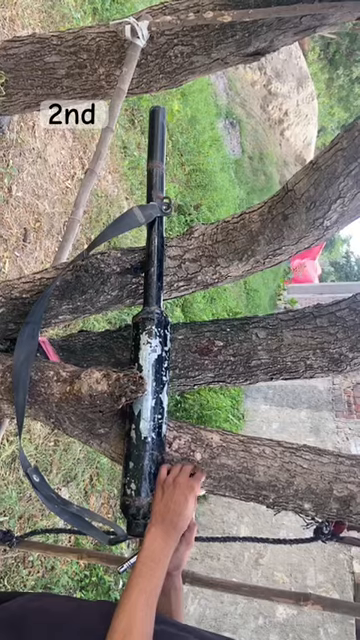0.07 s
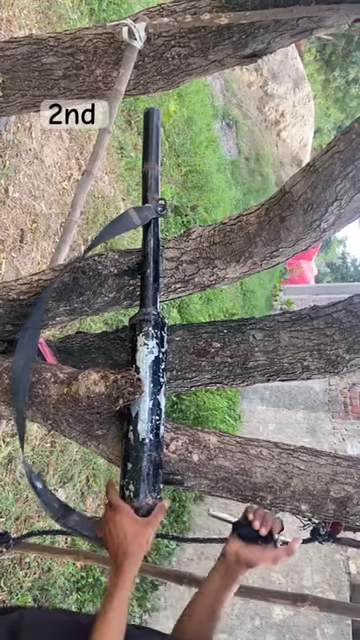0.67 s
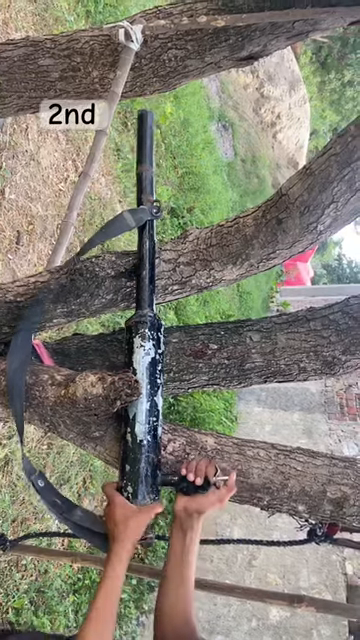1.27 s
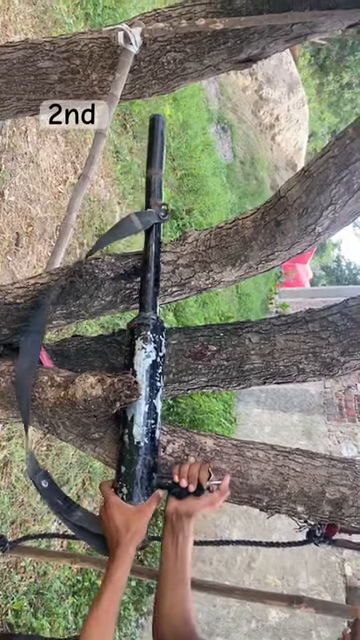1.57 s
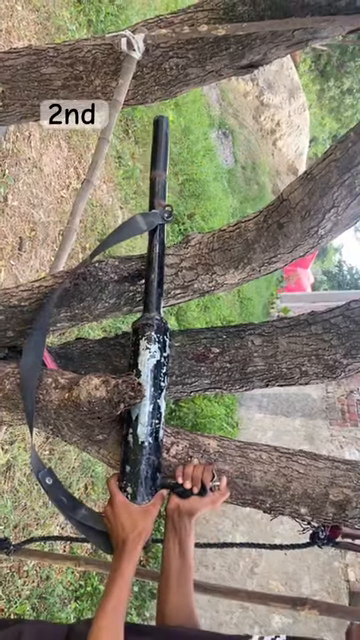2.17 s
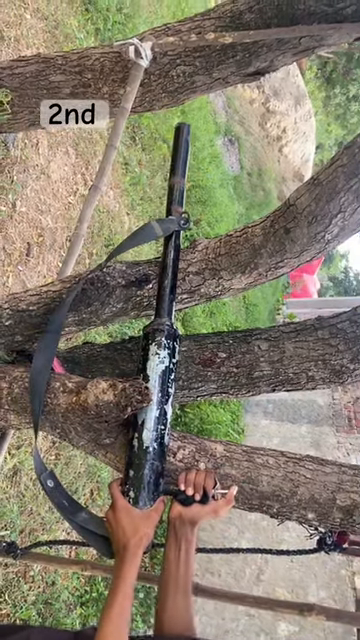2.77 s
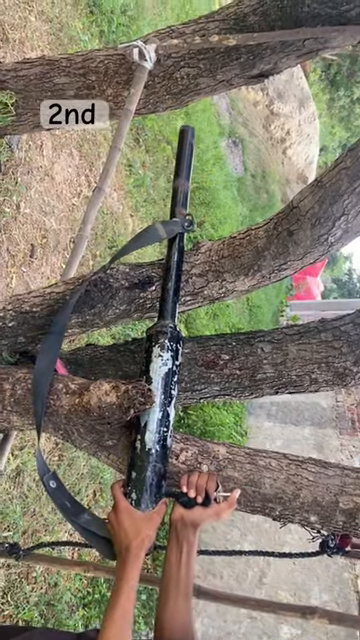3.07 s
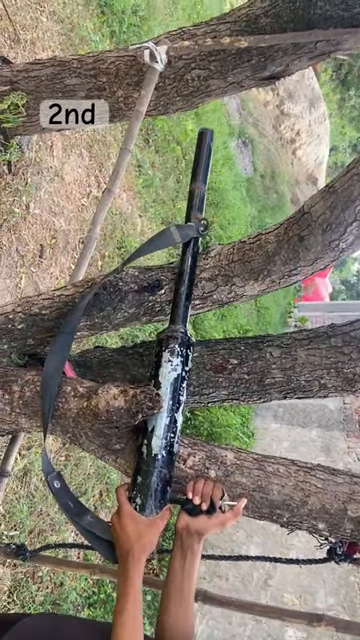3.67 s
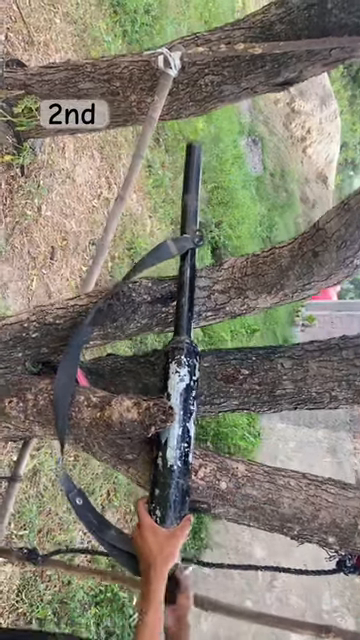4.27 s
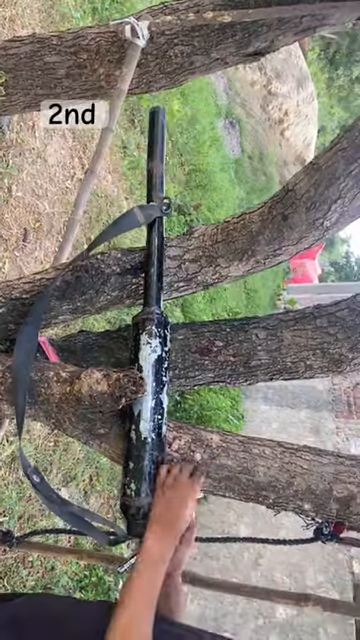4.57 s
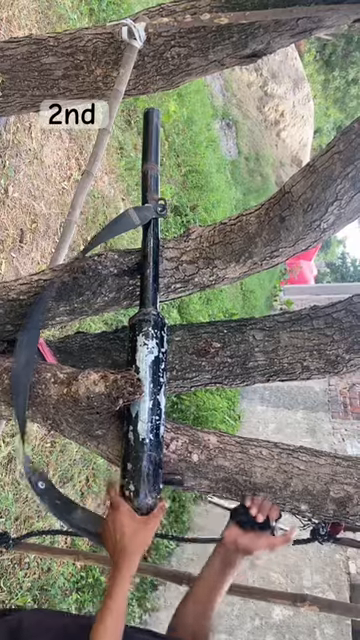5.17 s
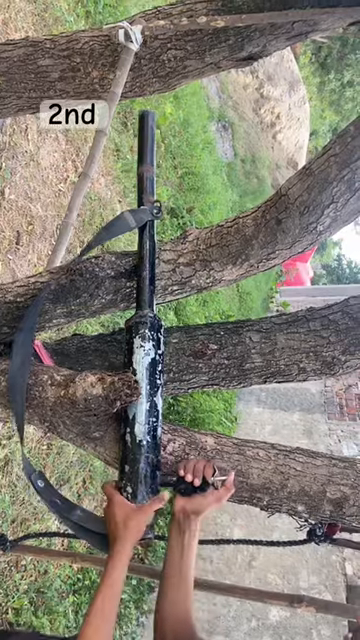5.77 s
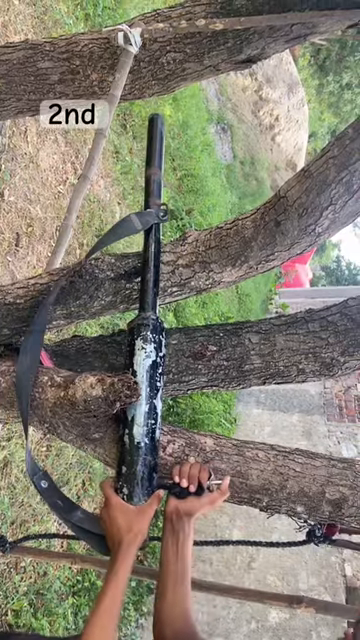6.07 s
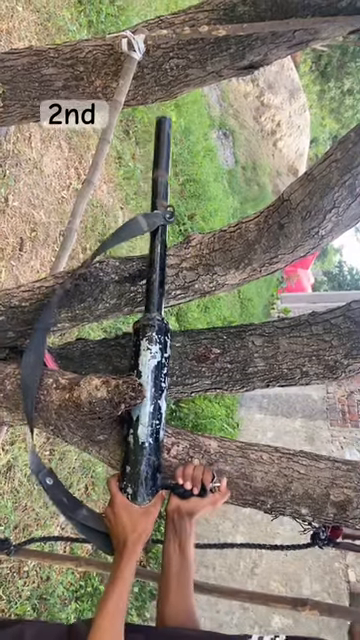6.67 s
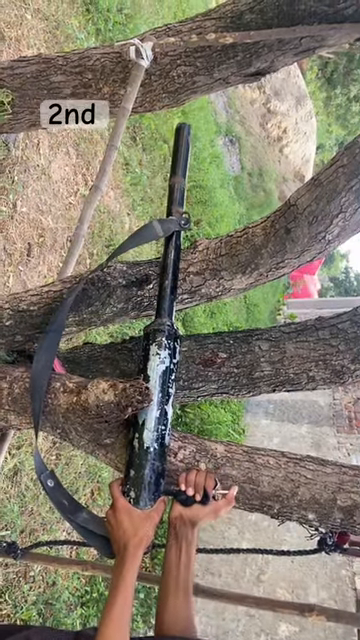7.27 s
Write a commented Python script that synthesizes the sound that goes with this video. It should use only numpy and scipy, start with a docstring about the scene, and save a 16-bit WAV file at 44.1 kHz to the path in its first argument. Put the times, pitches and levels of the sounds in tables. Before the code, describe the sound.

A pipe cannon fires two sharp, echoing bangs outdoors, with faint clicks before each and a loud, hollow double thump between them.

```python
"""Pipe cannon in a tree

A home-made pipe cannon is fired outdoors. A hand igniter ticks and scrapes into the steel chamber,
the gas swells into a blast, walls slap back and the far landscape rolls on. Hands then knock on the
pipe, ending in a loud, hollow double thump close to the microphone. The same sound then plays again
from the start and stops while the second shot is still rolling away."""
import sys
import numpy as np
from scipy import signal
from scipy.fft import rfft, irfft, next_fast_len
from scipy.io import wavfile
from scipy.ndimage import uniform_filter1d

SR = 44100
rng = np.random.default_rng(int(sys.argv[2]) if len(sys.argv) > 2 else 0)


def materialize(psi):
    """Save the field psi as 16-bit PCM at rate SR to the path in sys.argv[1].

    A 1-D psi becomes a single channel; in a 2-D psi each row is a channel.
    """
    bounded = np.clip(np.atleast_2d(psi).T, -1, 1)
    quanta = np.round(bounded * 32767).astype(np.int16)
    wavfile.write(sys.argv[1], SR, quanta)


N = 322371
START_S, END_S, REPEAT_S, SHOT_S = .036, 4.4877, 4.45168, 2.0838
T = np.arange(round(END_S * SR)) / SR   # the clock for one firing, in seconds
SIZE = next_fast_len(len(T) + SR // 4, real=True)
HZ = np.maximum(np.fft.rfftfreq(SIZE, 1 / SR), 1)
SIDES = np.array([[1], [-1]])   # left, right


def amp(db):
    """Turn decibels into a gain."""
    return 10 ** (np.asarray(db) / 20)


def pan(db):
    """Two gains that make the left side db louder than the right."""
    return amp(SIDES * db / 2)


def rms_one(x):
    """Scale a signal to an average strength (rms) of 1."""
    return x / np.sqrt(np.mean(x ** 2) + 1e-30)


def at_hz(points, hz):
    """Read between the rows of a table, spacing frequencies by octaves."""
    f, value = np.transpose(points)
    return np.interp(np.log(hz), np.log(f), value)


def filtered(x, response):
    """Turn each frequency of a sound up or down."""
    return irfft(rfft(x, SIZE) * response, SIZE)[..., :len(T)]


def causal(points):
    """Make a filter from a table so that nothing sounds early (minimum phase)."""
    cepstrum = irfft(np.log(amp(at_hz(points, HZ))), SIZE)
    lag = np.arange(SIZE)
    return np.exp(rfft(cepstrum * np.where(lag == 0, 1, 2 * (lag < SIZE // 2))))


def resonance(hz, width_hz):
    """A filter that rings at one pitch, with gain 1 there."""
    return 1 / (1 + 1j * (HZ ** 2 - hz ** 2) / (HZ * width_hz))


def band_noise(hz, width_hz):
    """Hiss gathered around one pitch."""
    return rms_one(filtered(rng.standard_normal(len(T)), resonance(hz, width_hz) ** 2))


def wobble(count, smooth_samples):
    """A random wander, made by smoothing noise."""
    return rms_one(uniform_filter1d(rng.standard_normal(count), int(smooth_samples)))


def thirds(noise, colour):
    """Split noise into bands a third of an octave apart: (centre_hz, share of the level, band)."""
    centres = 1000 * 2 ** (np.arange(-14, 12) / 3)
    shares = amp(at_hz(colour, centres)) * np.sqrt(centres)
    size = next_fast_len(noise.shape[-1], real=True)
    spectrum = rfft(noise, size)
    f = np.maximum(np.fft.rfftfreq(size, 1 / SR), 1)
    for hz, share in zip(centres, shares / np.linalg.norm(shares)):
        window = np.cos(np.pi / 2 * np.clip(3 * np.log2(f / hz), -1, 1)) ** 2
        yield hz, share, rms_one(irfft(spectrum * window, size)[:, :noise.shape[-1]])


def swell(t, peak_s, rise_db_per_s, hold_s, fall_db_per_s):
    """A gain that rises to 1, holds and falls."""
    before, after = np.maximum(peak_s - t, 0), np.maximum(t - peak_s - hold_s, 0)
    return amp(-rise_db_per_s * before - fall_db_per_s * after)


def bell(middle_s, half_s):
    """A smooth rise and fall around one moment."""
    return np.exp(-((T - middle_s) / half_s) ** 2 / 2)


def thud(start_s, db, first_hz, last_hz, glide_s, swell_s):
    """A short tone swells, sinks in pitch and quickly dies."""
    out, span = np.zeros(len(T)), (T > start_s) & (T < start_s + .2)
    t = T[span] - start_s
    sunk = 1 - np.exp(-t / glide_s)
    phase = 2 * np.pi * (last_hz * t + (first_hz - last_hz) * glide_s * sunk)
    envelope = (t / swell_s * np.exp(1 - t / swell_s)) ** 1.4
    out[span] = amp(db) * envelope * np.sin(phase)
    return out


# How alike left and right are (1 means the same): frequency_hz, likeness_0_to_1
LIKENESS = [(80, .95), (500, .75), (1100, .5), (2500, 0.8), (6000, .75), (10000, 1)]
def surrounding_noise():
    """Stereo hiss arriving from all around."""
    alike = np.clip(at_hz(LIKENESS, HZ), 0, 1)
    mid, side = rng.standard_normal((2, len(T)))
    return filtered(mid, np.sqrt(1 + alike)) + SIDES * filtered(side, np.sqrt(1 - alike))


# The tone of distant traffic and open air: frequency_hz, level_db
AIR_COLOUR = [(22, -18.5), (45, -4), (70, 1.5), (170, -15.5), (280, -18.5), (450, -16.5), (590, -23.5),
              (710, -19.5), (1000, -29), (1250, -37), (2000, -40), (3300, -47), (6500, -47), (9500, -58.5),
              (12500, -63)]
def open_air(level_db=-58.5, gain_dip_db=7, sink_s=.78, hold_s=.7, recovery_db_per_s=3):
    """Background rumble and hiss, turned down after the shot and slowly up, like a recorder's gain."""
    since = T - SHOT_S
    dip_db = gain_dip_db * np.clip(since / sink_s, 0, 1)
    recovered_db = recovery_db_per_s * np.maximum(since - sink_s - hold_s, 0)
    rumble = rms_one(filtered(surrounding_noise(), amp(at_hz(AIR_COLOUR, HZ))))
    return amp(level_db - dip_db + recovered_db) * rumble


# Light knocks on the pipe: start_s, level_db, last_pitch_hz
KNOCKS = [(.048, -51.5, 296), (.501, -51, 674), (3.4965, -58, 300), (3.521, -46.5, 200.4),
          (3.684, -52, 250), (3.915, -50, 198), (3.960, -52.5, 200)]
def knocks(first_hz=900):
    """Knuckles and rod hit the pipe; each knock sinks to its own pitch."""
    return sum(thud(s, db, first_hz, hz, glide_s=.00252, swell_s=.0022) for s, db, hz in KNOCKS)


# Soft swishes: middle_s, half_length_s, pitch_hz, width_hz, level_db
RUBS = [(0.30, 0.0333, 1980, 400, -80), (1.21, 0.0475, 9300, 1600, -92.5), (1.43, 0.067, 1790, 700, -85),
        (3.84, 0.0209, 3720, 1500, -86.5), (3.85, .03, 8350, 800, -96.5), (3.979, .16, 1400, 800, -82.5),
        (4.08, 0.228, 690, 400, -72.5)]
def rubs():
    """Hands, strap and bark rub, each rub a short swell of hiss."""
    return sum(amp(db) * bell(s, half_s) * band_noise(hz, width) for s, half_s, hz, width, db in RUBS)


# The rod taps the wall on its way in: start_s, level_db
TICKS = [(.345, -60), (0.395, -63.5), (0.458, -62), (.546, -62.5), (0.572, -56), (.683, -64), (.725, -63),
         (.823, -64)]
# It is pushed home in rasps that catch, fade and stop: start_s, level_db, length_s
SCRAPES = [(.891, -51, 0.023), (0.94, -52, 0.033), (0.975, -58, 0.056), (1.063, -59, 0.024),
           (1.096, -59.5, .045)]
# The notes of the chamber's air and steel wall: pitch_hz, width_hz, level_db
CHAMBER = [(791, 110, 15.5), (1564, 176, -3.5), (3550, 460, -18), (3980, 340, -16), (6300, 600, -29),
           (8020, 1100, -30)]
def igniter(grit=.98, uneven_db=3.5, slip_s=.0038, tick_fade_s=.0079, fade_db_per_s=123, stop_s=.0047):
    """The igniter rod's gritty friction makes the chamber ring, brighter for ticks than for scrapes."""
    ticks = sum(amp(db) * (T > s) * np.exp(-np.abs(T - s) / tick_fade_s) for s, db in TICKS)
    scrapes = 0
    for s, db, length_s in SCRAPES:
        stopping = np.exp(-np.maximum(T - s - length_s, 0) / stop_s)
        scrapes += amp(db - fade_db_per_s * np.abs(T - s)) * (T > s) * stopping
    slips = wobble(len(T), slip_s * SR)
    grains = rng.standard_normal(len(T)) * np.exp(grit * rng.standard_normal(len(T)))
    friction = rms_one(grains * amp(uneven_db * slips))
    body = sum(amp(db) * resonance(hz, width_hz) ** 2 for hz, width_hz, db in CHAMBER)
    bright_body = body * amp(3 * np.log2(HZ))   # 3 dB more per octave
    return sum(filtered(force * friction, ring / np.sqrt(np.mean(np.abs(ring) ** 2)))
               for force, ring in ((scrapes, body), (ticks, bright_body)))


def whistle(middle_s=.828, middle_hz=2240, sag_hz_per_s=4100, level_db=-68):
    """One faint falling note that grows less steady towards its end."""
    t = np.clip(T - middle_s, -.15, .15)
    waver = .017 * amp(110 * t) * wobble(len(T), smooth_samples=120)
    pitch_hz = (middle_hz - sag_hz_per_s * t) * (1 + waver)
    return amp(level_db) * bell(middle_s, half_s=.043) * np.sin(2 * np.pi * np.cumsum(pitch_hz) / SR)


# Soft, low bumps: start_s, level_db, last_pitch_hz
BUMPS = [(1.754, -42.5, 62), (4.240, -50, 197), (4.392, -30, 180)]
def bumps():
    """Handling the cannon makes dull bumps that sag a little in pitch."""
    return sum(thud(s, db, 1.3 * hz, hz, glide_s=.01, swell_s=.012) for s, db, hz in BUMPS)


def gas_jet(t, ignition_s=2.058, burst_db=-9, outflow_db=-29.5):
    """How hard the gas rushes out: a sharp burst on top of a weaker, longer outflow."""
    burst = swell(t, SHOT_S, rise_db_per_s=1800, hold_s=.003, fall_db_per_s=1999.5)
    outflow = swell(t, SHOT_S, rise_db_per_s=500, hold_s=.003, fall_db_per_s=460)
    return (amp(burst_db) * burst + amp(outflow_db) * outflow) * (t > ignition_s)


# The tone of the blast: frequency_hz, level_db
BLAST_COLOUR = [(35, -12.5), (80, -3.5), (170, -1), (290, 4.5), (440, -12.5), (660, 1), (900, -9.5),
                (1150, -3.5), (1550, -19.5), (1900, -11), (2600, -37.5), (3200, -22), (4000, -19.5),
                (5000, -41), (6400, -28.5), (8500, -43), (10000, -60.5), (11500, -78.5)]
# Which side the blast leans to: frequency_hz, left_minus_right_db
BLAST_PAN = [(200, 3.5), (430, 1.5), (660, -3), (1000, -5), (3000, -4.5), (5000, 0.5), (8000, -1.5)]
def blast(bass_lag_s=.012, lag_corner_hz=420):
    """Swirling gas bursts from the muzzle; the crack comes first and the lows swell after it."""
    out, span = np.zeros((2, len(T))), (T > 2) & (T < 2.3)
    for hz, share, band in thirds(surrounding_noise()[:, span], BLAST_COLOUR):
        envelope = gas_jet(T[span] - bass_lag_s / (1 + hz / lag_corner_hz))
        burst = band * envelope
        # scale each noise band to a fixed energy, so the blast's tone stays steady
        burst *= np.linalg.norm(envelope) / np.linalg.norm(burst, axis=1, keepdims=True)
        out[:, span] += share * burst * pan(at_hz(BLAST_PAN, hz))
    return out


def blast_whoop():
    """A quick falling whoop, then a low boom, heard with the blast."""
    whoop = thud(start_s=2.089, db=-14, first_hz=982, last_hz=110.7, glide_s=.0024, swell_s=.00449)
    boom = thud(start_s=2.0925, db=-19.5, first_hz=142.4, last_hz=82, glide_s=.003, swell_s=.0099)
    return (whoop + boom) * pan(2.5)


# Slaps from the ground, walls and trunks: start_s, level_db, left_minus_right_db
ECHOES = [(2.1345, -15, 1.5), (2.1520, -21.5, -1), (2.1548, -18.5, 1), (2.1580, -24, 1), (2.1700, -29, -1),
          (2.3690, -22, -1.5), (2.4155, -19.5, -3), (2.771, -44, 0)]
# The honking tone of a slap: frequency_hz, level_db
ECHO_COLOUR = [(60, -26.5), (300, -17), (520, -9), (660, -0.5), (900, -12), (1500, -23), (2200, -25),
               (4000, -38.5), (9000, -65.5), (12000, -90.5)]
def echoes(air_loss_db_per_khz_s=4):
    """Hard surfaces throw the shot back as short slaps; the air dulls the later ones."""
    tone = causal(ECHO_COLOUR)
    slaps = 0
    for s, db, pan_db in ECHOES:
        dulling = amp(-air_loss_db_per_khz_s * HZ / 1000 * (s - SHOT_S))
        delay = np.exp(-2j * np.pi * HZ * s)
        slaps += amp(db) * pan(pan_db) * dulling * delay
    return irfft(slaps * tone / np.abs(irfft(tone)).max(), SIZE)[:, :len(T)]


# Swells from stretches of land, near to far: peak_s, level_db, rise_db_per_s, fall_db_per_s
ROLLS = [(2.164, -37.5, 230, 38.5), (2.421, -35, 41, 103), (2.785, -56, 400, 106), (3.1, -75, 39, 34)]
# The tone of the roll at 2.5 s: frequency_hz, level_db
ROLL_COLOUR = [(35, -16), (60, -6), (85, 5.5), (125, -8), (240, -13.5), (430, -5.5), (690, 0.5), (900, -1),
               (1150, -8.5), (1600, -19), (2000, -21), (3200, -33), (5000, -47.5), (7500, -59.5),
               (11000, -84)]
def landscape_roll(gain_db=-2, air_loss_db_per_khz_s=6.5, lumpy_db=.84, lump_s=.008):
    """Countless far echoes overlap in lumps; the longer their way, the more treble the air takes."""
    out, span = np.zeros((2, len(T))), (T > 2.09) & (T < 3.6)
    t = T[span]
    lumps = wobble(len(t), lump_s * SR)
    swells = [amp(db) * swell(t, s, rise, .035, fall) for s, db, rise, fall in ROLLS]
    envelope = np.linalg.norm(swells, axis=0) * amp(lumpy_db * lumps)
    for hz, share, band in thirds(surrounding_noise()[:, span], ROLL_COLOUR):
        dulling = amp(-air_loss_db_per_khz_s * hz / 1000 * (t - 2.5))
        out[:, span] += share * band * envelope * dulling
    return amp(gain_db) * out


# Blows right by the microphone: start_s, level_db, swell_s, crack_db, skin_rub_db
THUMPS = [(4.4056, 2.2, 0.0088, -42.5, -33.5), (4.4197, -4, 0.0041, -29, -32.5),
          (4.4700, -24.5, .007, -63, -38.5)]
# A blow this close reaches the two sides out of step: frequency_hz, left_lead_radians
THUMP_PHASE = [(50, 0.7), (130, 0.73), (250, 0.31), (500, -1.42), (800, -2), (3000, -1.5)]
def thumps():
    """Each close blow on the pipe cracks, drops in pitch with a hollow sound and ends in a rub of skin."""
    crack = band_noise(hz=2830, width_hz=1700) * pan(8.5)
    skin = band_noise(hz=460, width_hz=220)
    out = np.zeros((2, len(T)))
    for s, db, swell_s, crack_db, skin_db in THUMPS:
        out += thud(s, db, first_hz=752, last_hz=77, glide_s=.00395, swell_s=swell_s)
        out += amp(crack_db) * bell(s + .0008, half_s=.00038) * crack
        out += amp(skin_db) * bell(s + .011, half_s=.0057) * skin
    out_of_step = np.exp(.5j * SIDES * at_hz(THUMP_PHASE, HZ))
    return filtered(out, out_of_step) * pan(1.8)


# How the microphone's right opening colours the sound: frequency_hz, boost_db
RIGHT_PORT = [(400, -0.9), (650, 5), (1000, 3), (1250, 3), (1750, 3), (3000, -1.5), (7750, 0), (8050, 15),
              (9500, 4), (11000, 2.5)]
# How far the left side is out of step with the right: frequency_hz, left_lead_radians
SIDE_PHASE = [(0, 0.21), (400, 0.94), (860, -2), (1720, -7), (2410, -8.5), (3700, -12.5), (4550, -11.5),
              (5100, -10.5), (6900, -5), (8200, -2)]
def microphone(x, colour_share=1):
    """Sound enters by two small openings; the left side is shifted out of step with the right, and the right
    opening rings more than the left."""
    lead = np.interp(HZ, *np.transpose(SIDE_PHASE))
    left = filtered(x[0], np.exp(1j * lead))
    right = filtered(x[1], causal([(hz, db * colour_share) for hz, db in RIGHT_PORT]))
    return np.array([left, right])


def scene():
    """One firing from loading to thumps, then the same again as far as the roll."""
    shot = blast() + blast_whoop() + echoes() + landscape_roll()
    small_sounds = knocks() + rubs() + igniter() + whistle() + bumps()
    once = microphone(shot + small_sounds) + microphone(open_air(), colour_share=.49) + thumps()
    once *= T >= START_S
    again = once[:, len(T) - round(REPEAT_S * SR):]
    return np.concatenate([once, again], axis=1)[:, :N]


def record(dry):
    """Round off the loudest peaks and cut the highest treble."""
    ceiling, stop_hz = .932, 13038
    rounded = dry / (1 + (dry / ceiling) ** 4) ** (1 / 4)
    treble_cut = signal.cheby2(14, 60, stop_hz, fs=SR, output="sos")
    return signal.sosfilt(treble_cut, rounded)


dry = scene()
out = record(dry)
materialize(out)
```